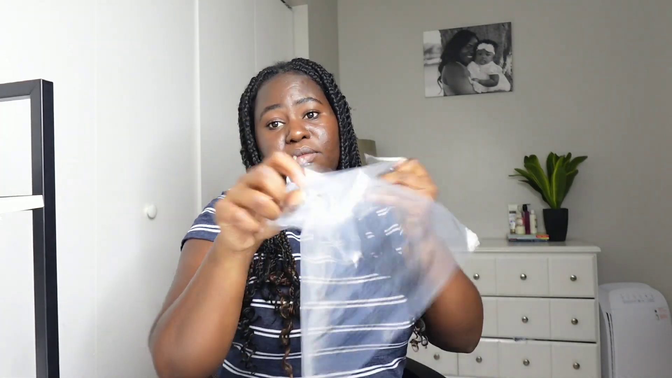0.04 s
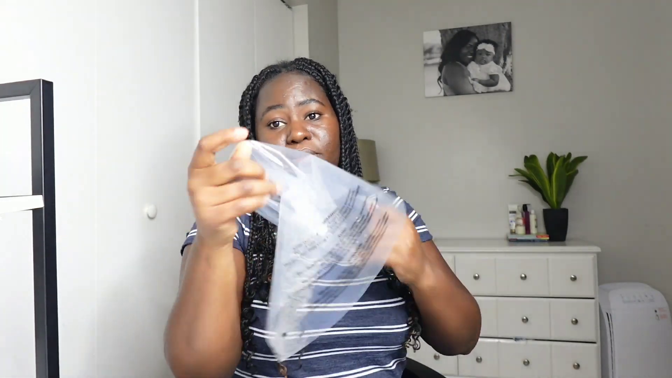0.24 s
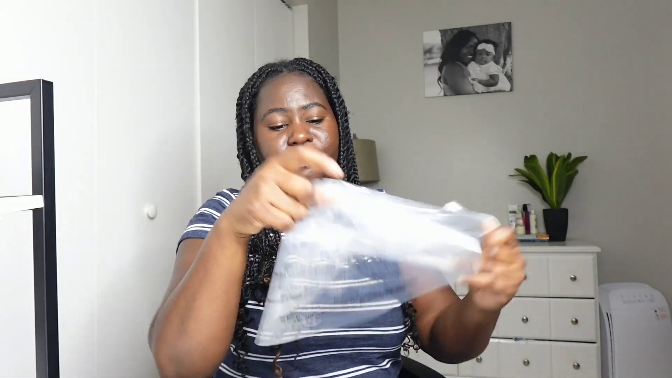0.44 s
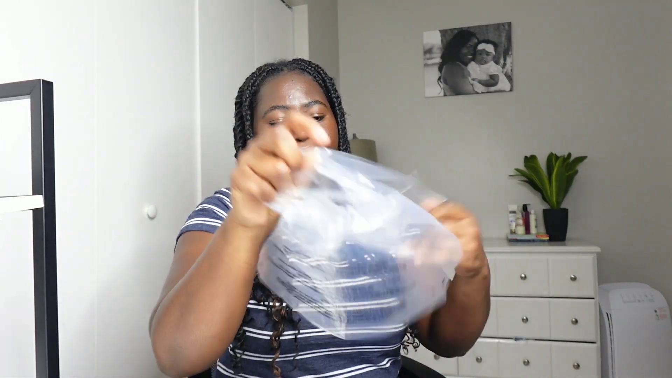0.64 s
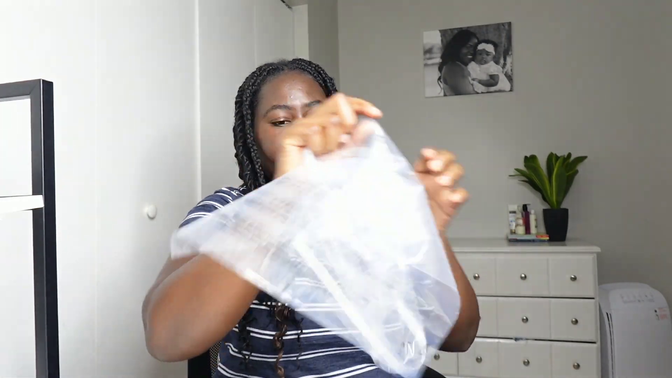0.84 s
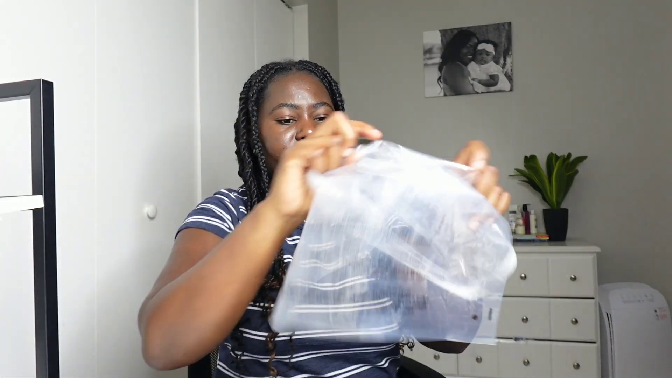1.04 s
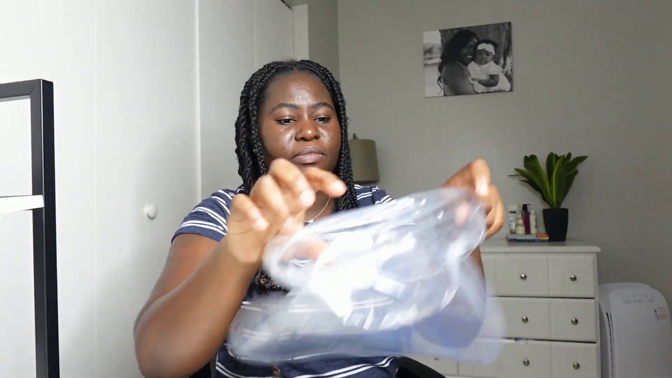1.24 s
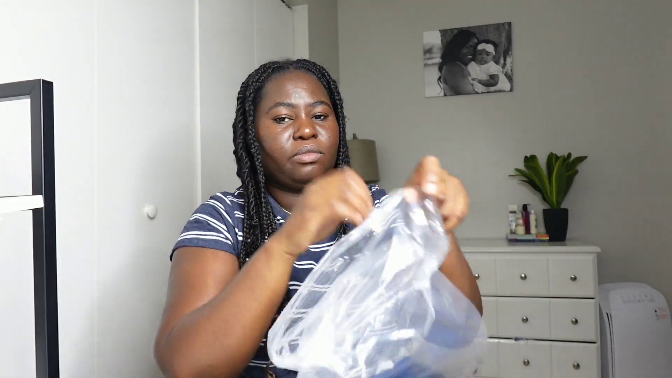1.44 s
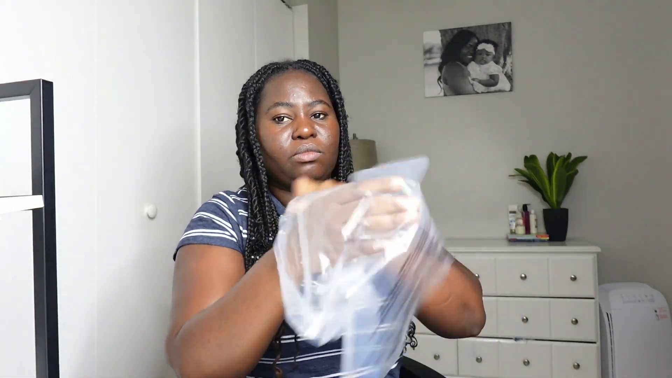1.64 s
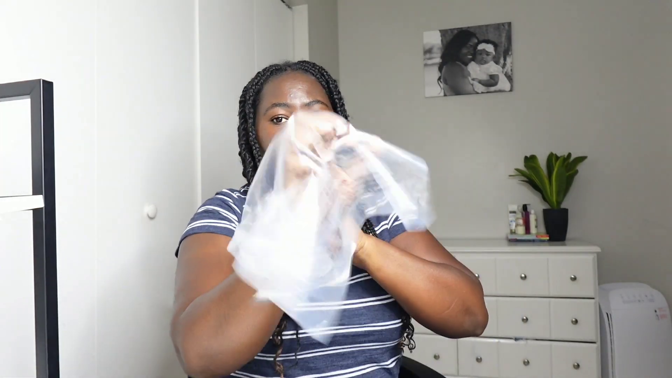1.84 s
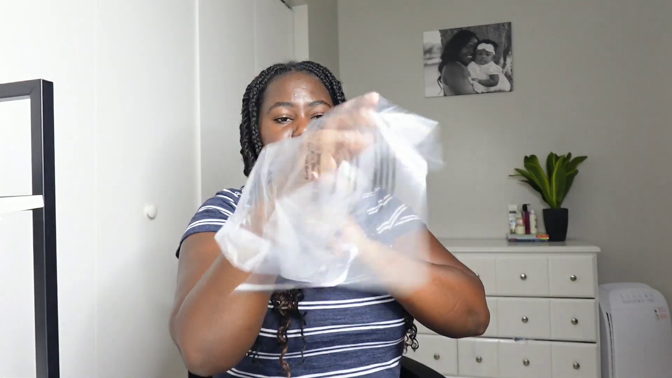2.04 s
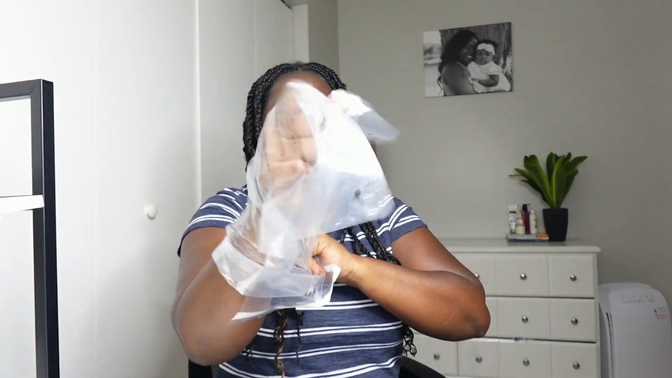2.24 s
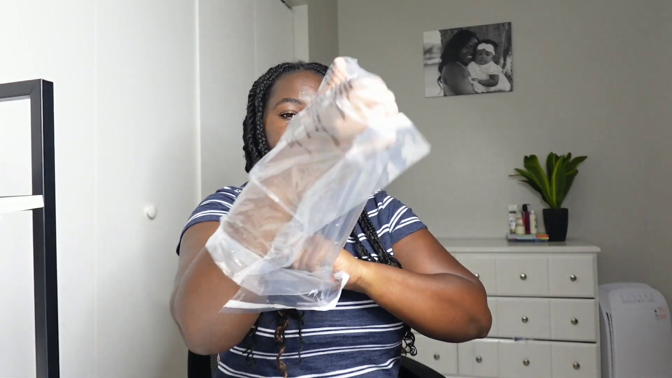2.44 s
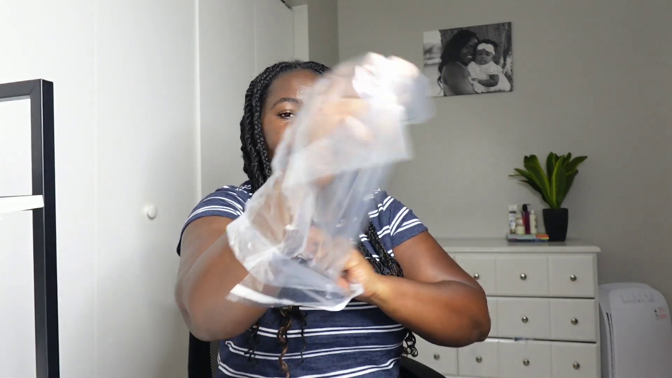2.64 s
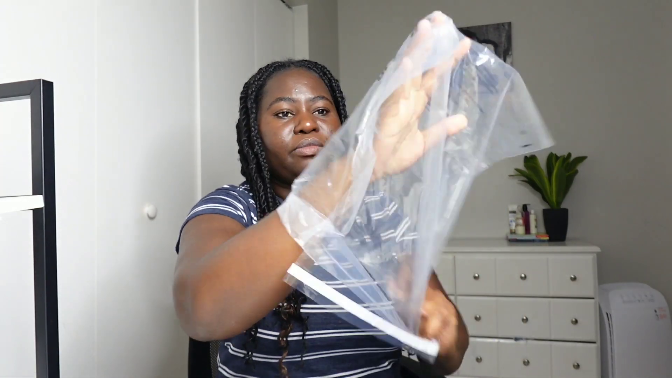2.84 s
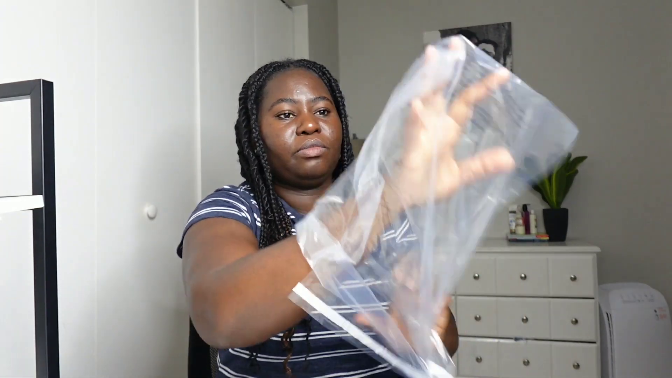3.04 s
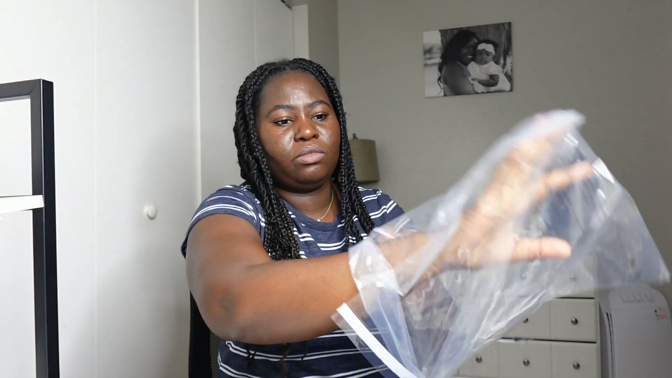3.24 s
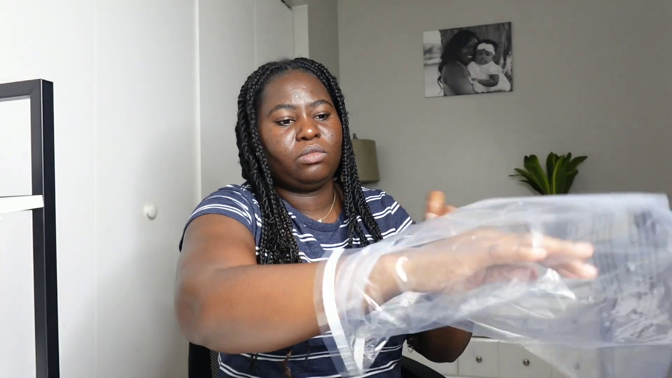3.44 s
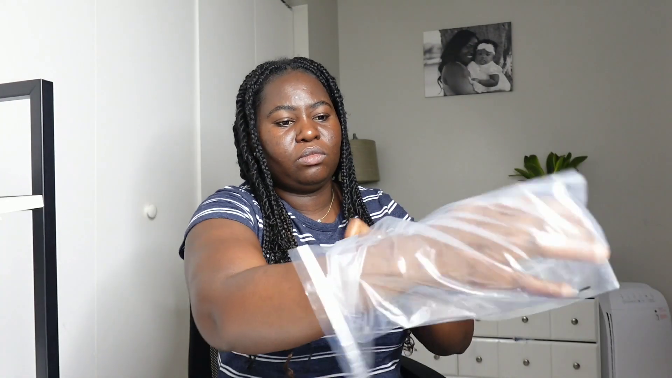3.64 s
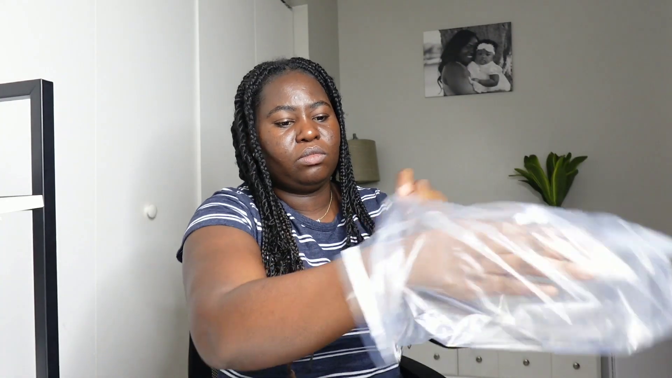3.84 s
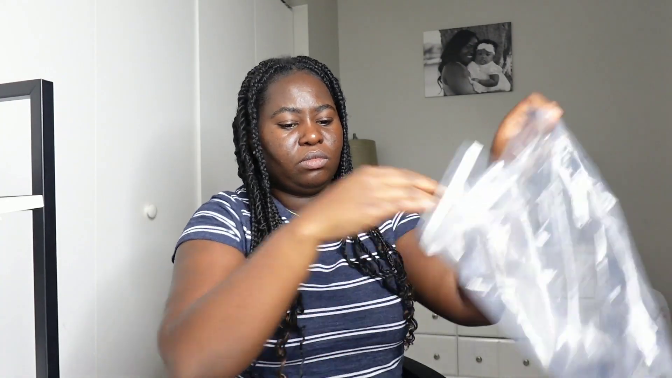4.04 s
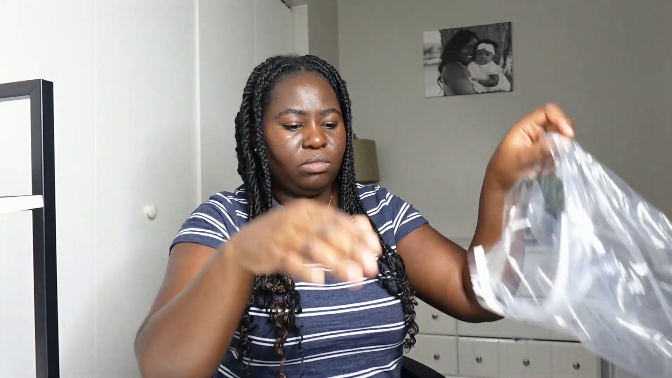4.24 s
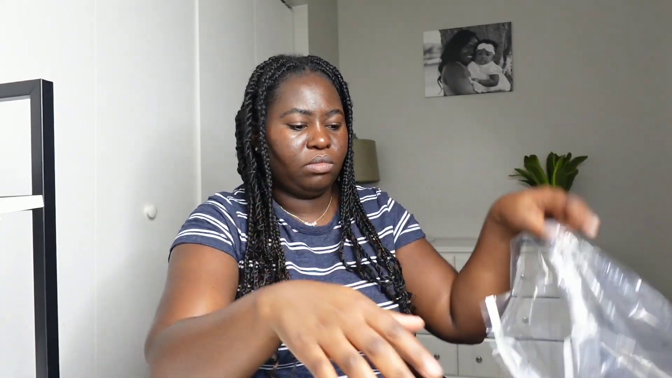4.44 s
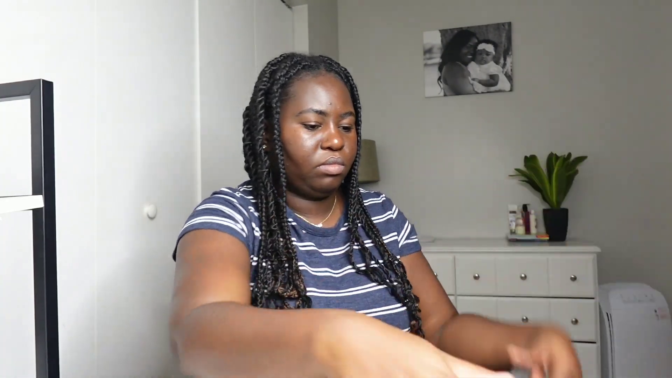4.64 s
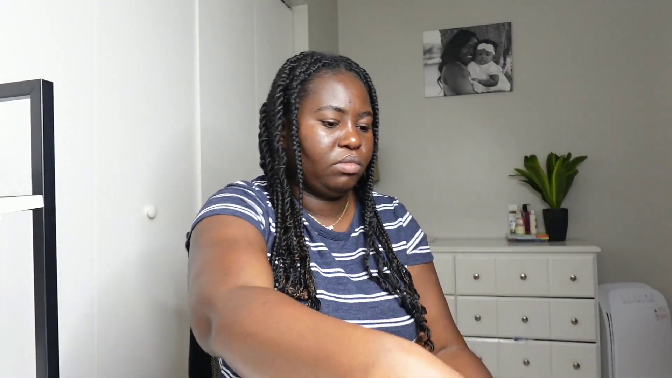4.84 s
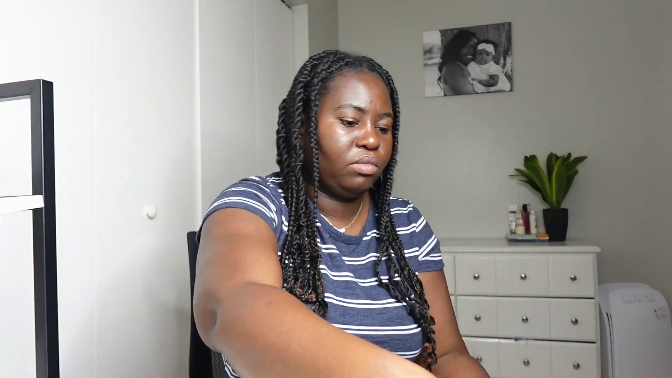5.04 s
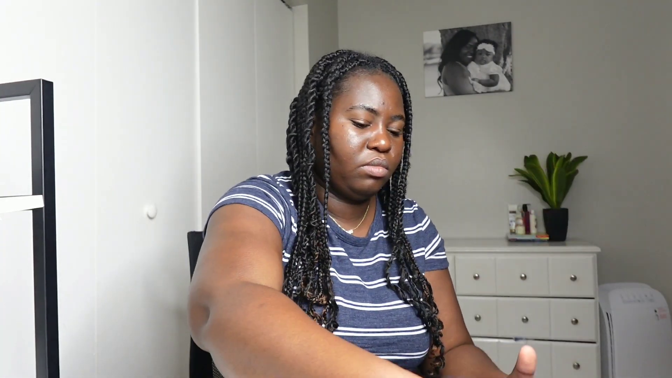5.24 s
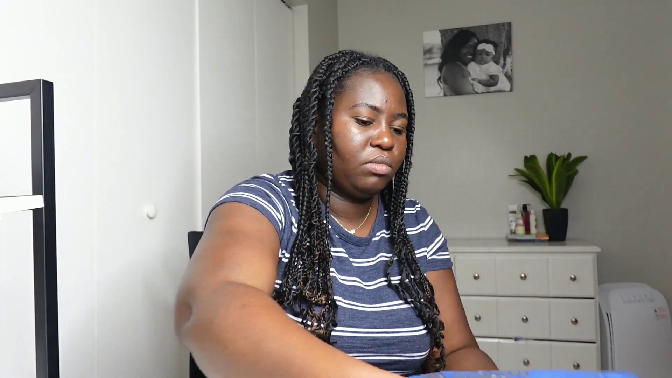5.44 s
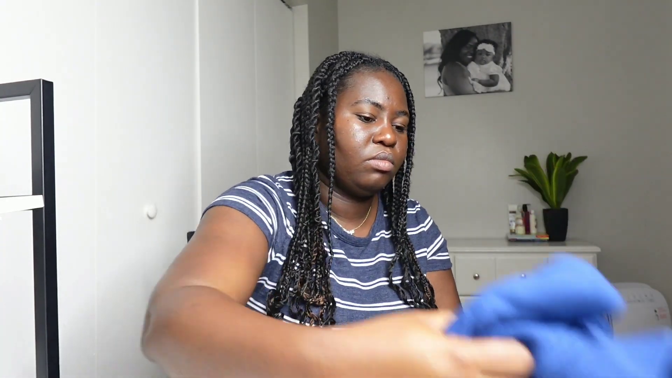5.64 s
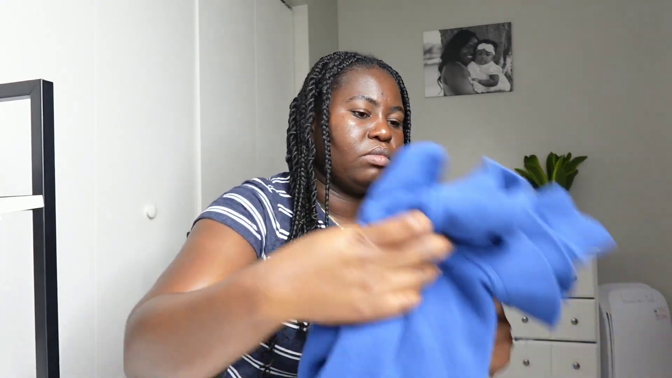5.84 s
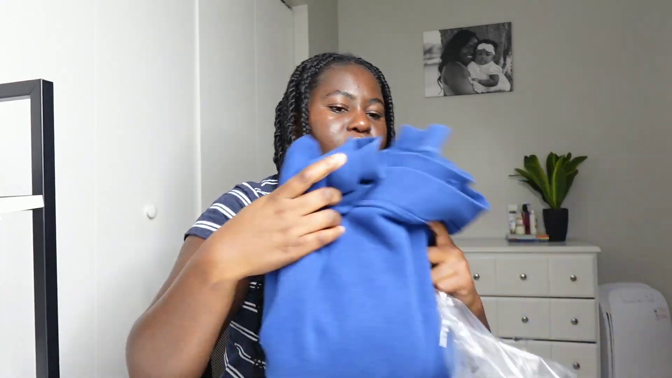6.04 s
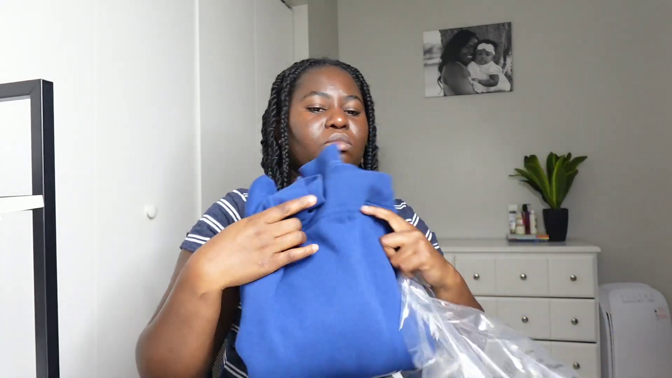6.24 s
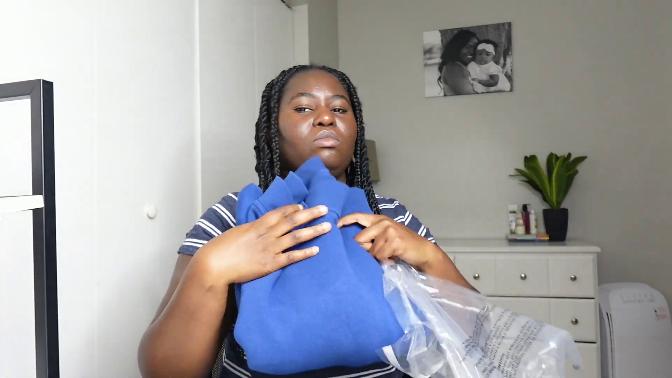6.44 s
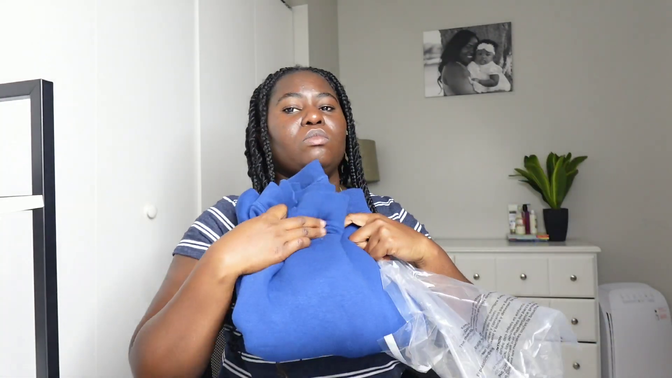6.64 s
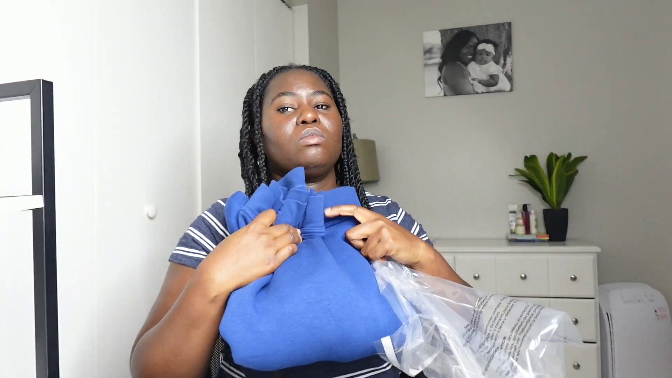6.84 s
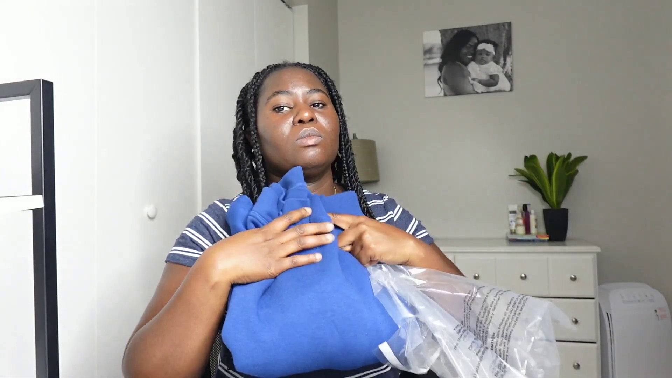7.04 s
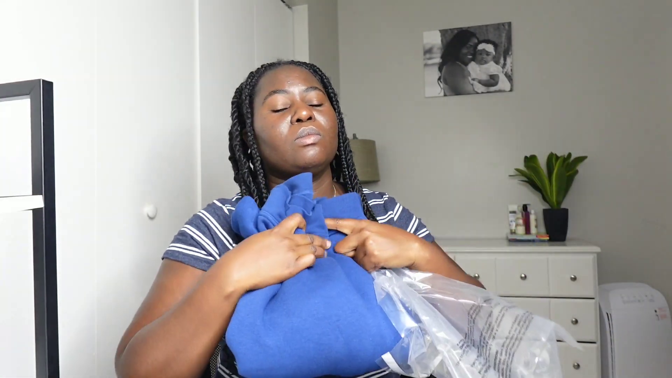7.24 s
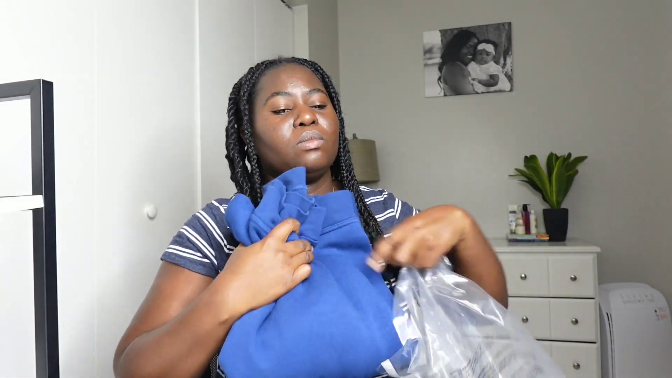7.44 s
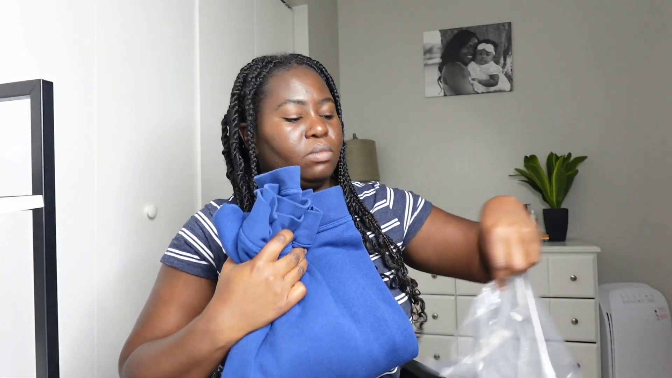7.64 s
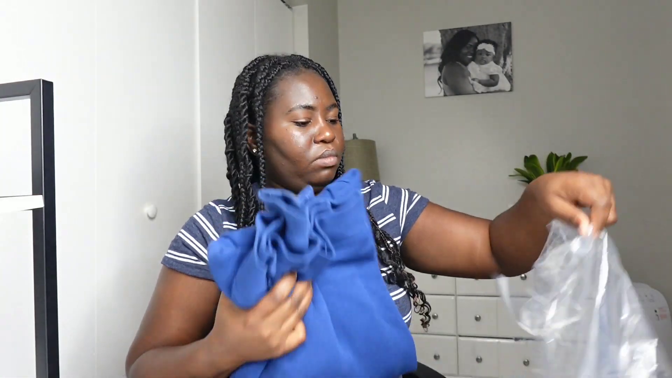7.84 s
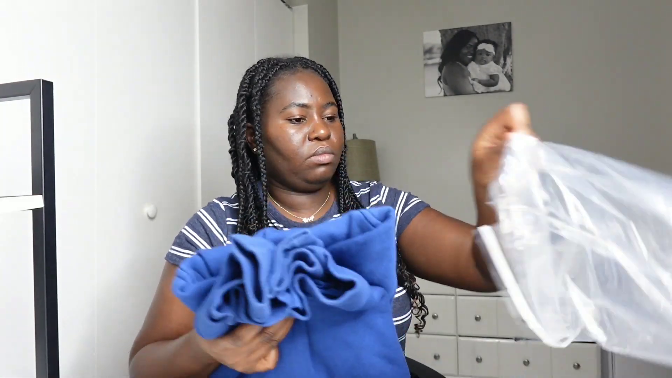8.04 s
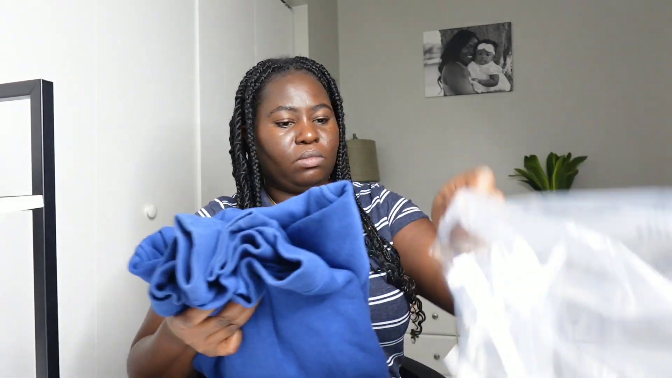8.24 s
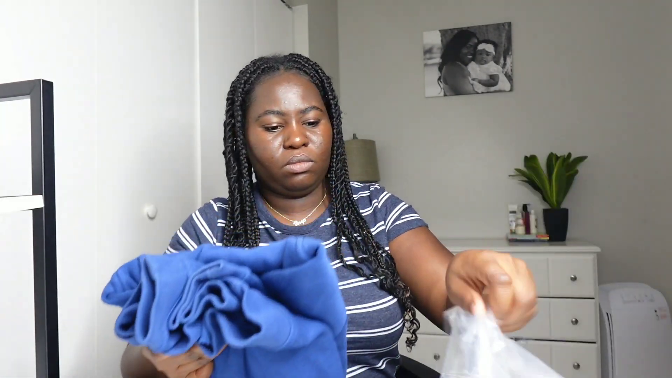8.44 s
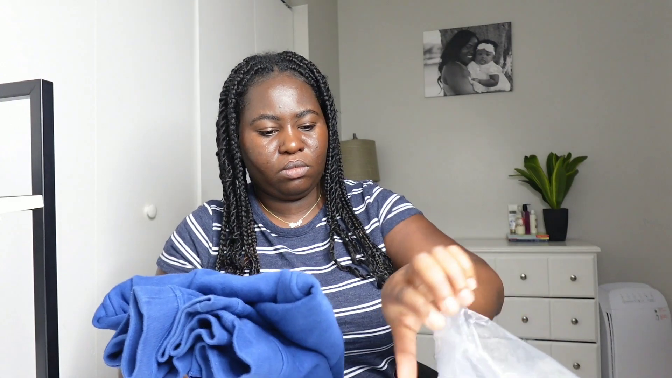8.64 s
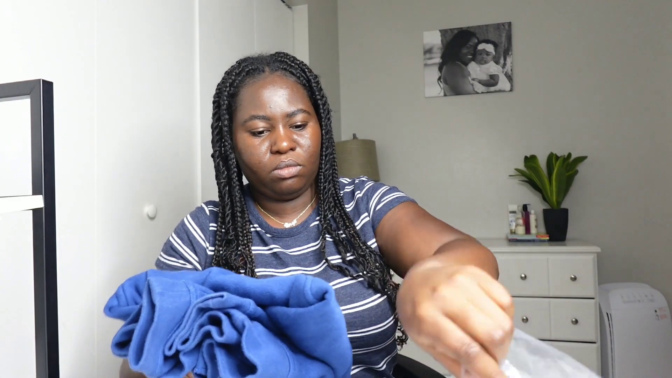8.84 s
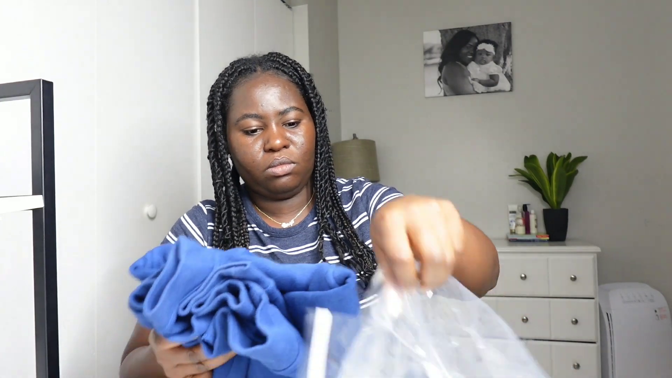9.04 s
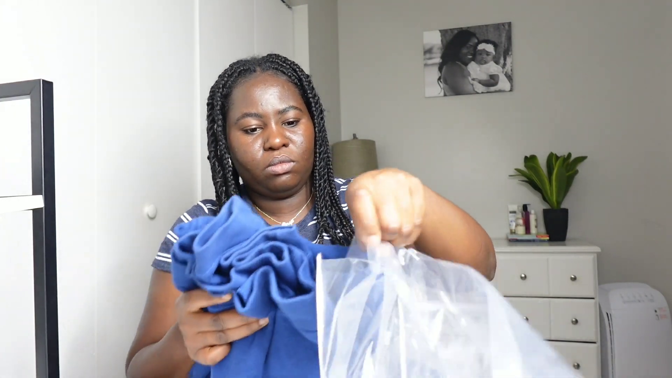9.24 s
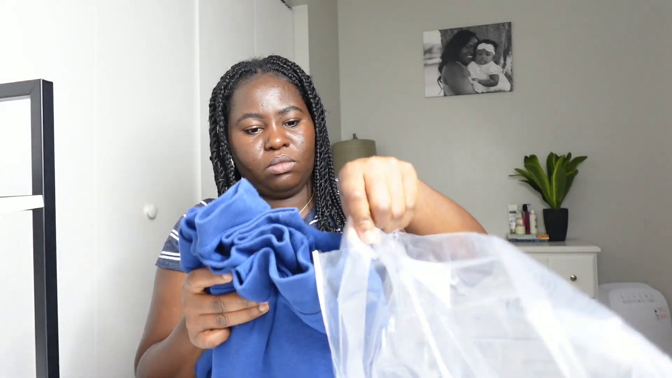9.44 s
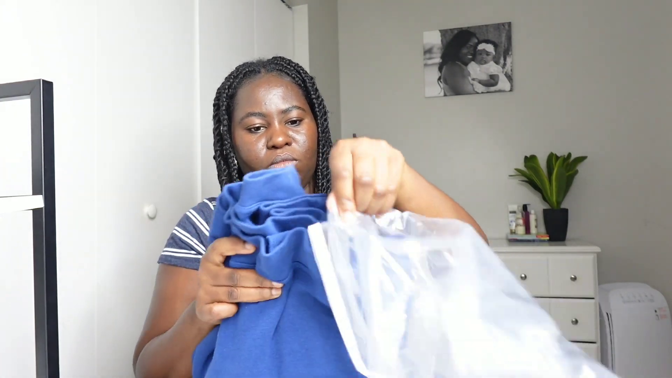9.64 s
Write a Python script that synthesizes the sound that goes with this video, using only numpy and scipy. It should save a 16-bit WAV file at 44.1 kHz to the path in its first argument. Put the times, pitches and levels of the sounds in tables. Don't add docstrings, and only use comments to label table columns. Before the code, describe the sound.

Bright, dense crackling of thin plastic film in a small room drops to soft rubbing and a light knock, then returns in uneven bursts.

```python
import sys
import numpy as np
from scipy import signal
from scipy.fft import rfft, irfft
from scipy.io import wavfile

SR = 44100
rng = np.random.default_rng(int(sys.argv[2]) if len(sys.argv) > 2 else 0)


def materialize(psi):
    bounded = np.clip(np.atleast_2d(psi).T, -1, 1)
    quanta = np.round(bounded * 32767).astype(np.int16)
    wavfile.write(sys.argv[1], SR, quanta)


def invert_db(x):
    u = np.asarray(x, float) / 20
    return 10 ** u


N = 427769


def rms_one(x):
    return x / np.sqrt(np.mean(x ** 2) + 1e-20)


def in_time(rows):
    s, *columns = np.transpose(rows)
    return [np.interp(np.arange(N) / SR, s, column) for column in columns]


def at_hz(points, hz):
    point_hz, value = np.transpose(points)
    return np.interp(np.log(hz), np.log(point_hz), value)


def coloured(x, spectrum, remove=1, size=4096):
    bin_hz = np.arange(1, size // 2 + 2) * SR / size
    wanted = invert_db(at_hz(spectrum, bin_hz)) / remove
    cepstrum = irfft(np.log(wanted))
    cepstrum[1:size // 2] *= 2
    cepstrum[size // 2 + 1:] = 0
    response = irfft(np.exp(rfft(cepstrum)))[:size]
    return signal.oaconvolve(x, response)[:N]


def band(x, low_hz, high_hz):
    return signal.sosfilt(signal.butter(2, [low_hz, high_hz], "band", fs=SR, output="sos"), x)


def split(x, edges_hz):
    lows = []
    for hz in edges_hz:
        order = 4 if hz < 3000 else 1
        lows.append(signal.sosfiltfilt(signal.butter(order, hz, fs=SR, output="sos"), x))
    return [upper - lower for lower, upper in zip([0, *lows], [*lows, x])]


def drift(rate):
    r = np.exp(-80 * np.pi * rate / SR)
    slow = signal.lfilter([1], [1, -2 * r, r * r], rng.standard_normal(N // 40 + 2002))[2000:]
    return np.interp(np.arange(N) / 40, np.arange(len(slow)), rms_one(slow))


def pair(alike, size):
    mid, side = rng.standard_normal((2, size))
    alike = np.clip(alike, 0, 1)
    return np.sqrt(1 + alike) * mid + np.sqrt(1 - alike) * side * [[1], [-1]]


# pitch in Hz, level in dB rms.
MOTOR_HUM = [(58.7, -86), (59.46, -87)]
# pitch in Hz, density in dB per Hz.
HISS_COLOUR = [(30, -23), (70, -4.5), (150, 5), (380, 5), (550, 1.5), (4000, -12), (9000, -20),
               (16000, -20)]
HISS_DB, HISS_ALIKE, HUM_LOUDEST_S = -61.5, 0.36, 7.22


def background():
    t = np.arange(N) / SR - HUM_LOUDEST_S
    hum = sum(np.sqrt(2) * invert_db(db) * np.sin(2 * np.pi * hz * t) for hz, db in MOTOR_HUM)
    hiss = np.array([coloured(side, HISS_COLOUR) for side in pair(HISS_ALIKE, size=N)])
    return invert_db(HISS_DB) * rms_one(hiss) + hum


# hardest grip in seconds, crackle in dB,
# seconds to rise 20 dB, seconds to fall 20 dB (signs ignored), flap of the sheet over crackle in dB.
OPENING = [(0.085, -21, 0.588, 0.42, -14.5), (0.125, -27, -0.15, 0.03, -14.0),
           (0.335, -23.5, 0.15, 0.5, -14), (0.464, -23, 0, 0.1, -21), (0.686, -24.5, 0.5, 0.11, -19.5),
           (0.988, -27.0, -0.01, 0.32, -21), (1.082, -19.0, 0.0742, 0.17, -22),
           (1.143, -20, 0.06, 0.14, -16.0), (1.302, -27.5, 0.19, 0.04, -14.5),
           (1.412, -29.5, 0, 0.6, -14.5), (1.544, -20.5, -0.06, 0.4, -15.0),
           (1.708, -18.5, 0.1, 0.27, -16.5), (1.924, -20, 0.31, 0.07, -18.5), (2.008, -23, 0.06, 0.1, -16),
           (2.03, -18.5, 0.09, 0.18, -15.5), (2.056, -22, 0.17, 0, -17.0), (2.162, -23, 0.12, 0.45, -25.5),
           (2.364, -22.0, 0.54, 0.18, -15.0), (2.571, -19, 0.16, 0.07, -17.5), (2.672, -23, 0, 0.18, -20.5),
           (2.725, -21.5, 0.12, 0.22, -20), (2.9, -23.5, 0.15, 0.07, -22), (3.015, -32, 0.1, 0.24, -14),
           (3.17, -41, 2, 0.08, -21), (3.287, -30, 0.1, 0.42, -30), (3.505, -20, 0.12, 0.2736, -23),
           (3.56, -18.5, 0.19, 0.1762, -14), (3.943, -26, 0.16, 0.03, -25.5),
           (4.026, -28.0, 0.9, 0.1753, -16.5)]
LAYING_ASIDE = [(4.234, -43, 0.003, 0.18, -18.5), (4.433, -37.5, 0.0075, 0.11, -33),
                (4.557, -39, 0.22, 0.13, -21), (4.705, -38, 0.012, 0.4, -23),
                (4.864, -35.5, 0.36, 0.14, -14), (5.016, -38.5, 0.019, 0.27, -12),
                (5.203, -44, 0.14, 0.35, -11), (5.275, -46, 0.18, 0.045, -20),
                (5.416, -50, 0.247, 0.46, -9.5), (5.632, -54, 0.012, 0.46, -5),
                (5.778, -44.5, 0.005, 0.24, -5), (5.874, -37, 0.19, 0.13, -12.5),
                (6.022, -39.5, 0.003, 0.23, -12.5), (6.246, -41.0, 0.003, 0.37, -16),
                (6.532, -51.5, 0.14, 0.19, -12), (6.952, -51.5, 0.22, 0.41, -12),
                (7.083, -61, 0.012, 0.17, -6), (7.282, -55, 0.012, 0.082, -16)]
TAKING_UP = [(7.331, -52.5, 0.003, 0.55, -16), (7.44, -50, 0.046, 0.083, -11),
             (7.541, -28.5, 0.0033, 0.092, -19), (7.596, -34.5, 0.26, 0.72, -19.5),
             (7.667, -34, 0.04, 0.093, -29), (7.768, -37.5, 0.18, 0.063, -28),
             (7.939, -29.5, 0.071, 0.074, -12.5), (8.249, -38.5, 0.39, 0.29, -23),
             (8.421, -25, 0.005, 0.15, -17.5), (8.582, -42, 0.17, 0.08, -11.5),
             (8.823, -34.5, 0.0071, 0.19, -18), (8.853, -40, 0.051, 0.95, -10.5),
             (8.864, -29.5, 0.047, 0.2, -34), (9.013, -32.5, 0.027, 0.075, -14.0),
             (9.116, -34, 0.05, 0.37, -14.5), (9.268, -40, 0.071, 0.084, -22),
             (9.457, -31, 0.16, 0.054, -18.5), (9.69, -28.5, 0.24, 0.04, -19)]
SWARM_DB, SWARM_FALL_S, SWARM_FLAP_DB = -26, 0.06, -22


def handling():
    t = np.arange(0, N, 32) / SR
    crackle_power, flap_power = 1e-12, 1e-12
    swarms = [(s, db + SWARM_DB, 0, SWARM_FALL_S, SWARM_FLAP_DB) for s, db, hz, decay_ms in large_creases()]
    for s, db, rise_s, fall_s, flap_db in [*OPENING, *LAYING_ASIDE, *TAKING_UP, *swarms]:
        before = (s - t) / max(abs(rise_s), .002)
        after = (t - s) / max(abs(fall_s), .01)
        power = invert_db(2 * db - 40 * np.where(t < s, before, after))
        crackle_power = crackle_power + power
        flap_power = flap_power + power * invert_db(2 * flap_db)
    return [np.interp(np.arange(N) / SR, t, 10 * np.log10(p)) for p in (crackle_power, flap_power)]


def buckle(noise, hz, width_hz, rise_s, decay_s, ring_share):
    t = np.arange(1, len(noise) + 1) / SR
    rise = np.minimum(t / max(rise_s, 1e-5), 1) ** 2
    fall = np.exp(-np.maximum(t - rise_s, 0) / max(decay_s, 5e-5))
    tick = noise * rise * fall
    r = np.exp(-np.pi * width_hz / SR)
    rung = signal.lfilter([1, 0, -1], [1, -2 * r * np.cos(2 * np.pi * hz / SR), r * r], tick)
    both = ring_share * rms_one(rung) + rms_one(tick)
    return both / np.abs(both).max()


def needles(crackle_db, top_db, dense_db):
    mean_per_s = 20 * invert_db(4.0 * drift(12) - 1.5 * dense_db + .4 * (crackle_db + 30))
    born = rng.random(N) < mean_per_s / SR
    sizes = invert_db(19 + 4.8 * rng.standard_normal(N)) * rng.choice([-1, 1], N)
    return band(born * sizes * invert_db(crackle_db + 0.24 * top_db), 5000, 17000)


# pitch in Hz, density in dB per Hz.
FILM_COLOUR = [(35, -33), (60, -27), (110, -8.5), (260, -0.5), (400, 1), (490, -4), (620, -2.5), (1000, 2),
               (2000, 2.5), (4000, 3.5), (8000, 0), (12000, -2.5), (16000, -6)]
# time in seconds, extra density in dB, size spread in dB.
GRAIN = [(0, 2.5, 2), (4.2, 2.5, 2.5), (4.45, 15, 2.5), (5.95, 15, 0), (6.05, 11, -2.5), (7.3, 11.5, -0.5),
         (7.6, 6, 1), (9.7, 5, 2)]


def crackle(crackle_db, top_db, flap_db, middle_db, count=20):
    dense_db, spread_db = in_time(GRAIN)
    mean_per_s = 2200 * invert_db(.4 * (crackle_db + 30.0) + dense_db)
    clumps = invert_db(1.2 * drift(30) + 1.6 * drift(160))
    born = rng.random(N) < mean_per_s * clumps / SR
    sizes = invert_db(spread_db * (np.minimum(rng.exponential(1, N), 4.5) - 1.17)) * rng.choice([-1, 1], N)

    patch = rng.integers(0, count, N)
    noise = rng.standard_normal((count, 256))
    patch_hz = np.geomspace(1800, 13000, count)
    shapes = [rms_one(buckle(n, hz, 0.3 * hz, .0001, 0.0004, 0.9)) for n, hz in zip(noise, patch_hz)]
    ticks = sum(signal.oaconvolve(sizes * born * (patch == k), shape)[:N] for k, shape in enumerate(shapes))
    own_colour = np.sqrt(np.mean(np.abs(rfft(shapes, 4096)) ** 2, axis=0))
    sheet = coloured(ticks / np.sqrt(mean_per_s), FILM_COLOUR, remove=own_colour)
    low, middle, main, top = map(rms_one, split(sheet, [600, 2000, 9000]))

    air = coloured(rng.standard_normal(N), FILM_COLOUR) * invert_db(3.5 * drift(9))
    flap = rms_one(rms_one(split(air, [600])[0]) + 0.82 * low)
    body = invert_db(flap_db) * (flap + invert_db(middle_db) * middle)
    bright = invert_db(crackle_db - 2.0) * (main + invert_db(top_db + 0.5) * top)
    return bright + body + needles(crackle_db, top_db, dense_db)


SHAKING_ENDS_S = 4.1
CREASE_OVER_DB, CREASE_SPREAD_DB = 11.5, 2


def lesser_creases(crackle_db, count=45):
    when, size, pitch = rng.random((count, 3)).T
    s = when * SHAKING_ENDS_S
    around_db = (crackle_db - 0.45 * in_time(GRAIN)[0])[(s * SR).astype(int)]
    db = around_db + CREASE_OVER_DB - CREASE_SPREAD_DB * np.log(size + 0.044)
    return list(zip(s, db, 2300 * 4.0 ** pitch, 1 - pitch / 2))


# sharpest tick in seconds, strength in dB, ring in Hz, decay
# in ms.
SNAPS = [(0.0276, -0.5, 3790, 0.93), (0.1252, -5.5, 3880, 1.1), (0.2385, -8, 6290, 0.45),
         (0.3055, -7.0, 8440, 0.35), (0.4572, -8, 7110, 0.8), (0.5481, -11, 7540, 0.85),
         (0.5704, -7.0, 11710, 0.59), (0.5809, -9, 3230, 0.82), (0.5997, -4, 12880, 0.61),
         (0.6732, -6, 10590, 0.67), (0.7374, -11.5, 3270, 0.78), (0.7735, -9.5, 3190, 1.53),
         (0.8334, -19, 9260, 0.49), (0.8517, -19.0, 3920, 0.8), (0.8717, -21.5, 5040, 0.7),
         (0.896, -22.0, 4780, 0.93), (0.9194, -25.5, 7920, 1.17), (1.1339, -2.0, 4570, 0.66),
         (1.2322, -8.5, 10420, 0.85), (1.2975, -7.5, 3140, 0.63), (1.3081, -14, 9130, 0.7),
         (1.3412, -16, 7540, 0.8), (1.3837, -12.5, 8910, 1.5), (1.4116, -10, 9990, 0.96),
         (1.4247, -11, 10080, 1.59), (1.4458, -8, 4180, 1.2), (1.4705, -11, 3880, 1.34),
         (1.4975, -15, 3880, 1.6), (1.5055, -15, 8830, 1.6), (1.5425, -13, 4820, 1.59),
         (1.5833, -0.5, 7240, 1.45), (1.6395, -5, 8740, 0.45), (1.8113, -3.5, 4740, 0.68),
         (1.8741, -2, 3450, 1.39),
         (2.007, -4.5, 9040, 1.11), (2.131, -7.5, 5340, 1.42), (2.1646, -7, 1940, 0.49),
                  (2.1982, -3.5, 11840, 1.08), (2.3322, -2, 10470, 0.67), (2.4142, -4, 6930, 1.2),
                  (2.4811, -5, 7490, 0.78), (2.653, -10.5, 2840, 1), (2.6876, -4, 8830, 0.54),
                  (2.8078, -1, 11930, 0.76), (2.909, -6.5, 7490, 0.55), (2.9783, -8, 5210, 0.82),
                  (3, -10, 3700, 1.1), (3.0059, -11.5, 6590, 1.5), (3.027, -10.5, 5210, 1.23),
                  (3.0986, -18, 5340, 1.6), (3.102, -13, 7400, 1), (3.133, -18.5, 7360, 0.94),
                  (3.1584, -19, 4090, 1.6), (3.1661, -24, 3660, 1.16), (3.188, -17, 3880, 1.2),
                  (3.233, -20.5, 3750, 1.41), (3.2436, -14, 3400, 0.46), (3.419, -10, 4650, 1.3),
                  (3.4261, -10.0, 12530, 0.62), (3.4556, -6.5, 4740, 1.09), (3.473, -2, 6680, 0.69),
                  (3.6868, -12, 6160, 0.71), (3.7025, -13, 3620, 1.2), (3.7219, -7.5, 6680, 1.1),
                  (3.8635, -10, 4970, 1.6), (3.8933, -8, 4480, 1.7), (4.0251, -11.5, 4010, 1.21),
                  (4.0424, -12.0, 3620, 1.07),
         (4.1725, -26.5, 2890, 1.6), (4.219, -29.5, 2540, 1.6), (4.227, -29.5, 2070, 0.89),
               (4.2342, -14, 4200, 0.75), (4.2397, -25.5, 4780, 0.82), (4.2528, -23, 3100, 0.76),
               (4.4113, -29, 3920, 1.6), (4.4355, -22.5, 3490, 1.08), (4.4531, -22.0, 8700, 1.4),
               (4.4703, -23.5, 4610, 1.25), (4.5184, -24.0, 4050, 1.4), (4.6091, -23.5, 8660, 1.5),
               (4.7037, -20, 9650, 1.1), (5.015, -23, 4570, 1.12), (5.0942, -23.5, 3920, 1),
               (5.1933, -24.5, 5990, 1.21), (5.2046, -25, 5680, 0.73), (5.6408, -33.5, 5120, 1.35),
               (5.6774, -27, 4390, 0.91), (5.8203, -21.0, 5560, 1.6), (5.8501, -17.5, 9730, 1.5),
               (5.979, -34, 4950, 1.25), (6.0219, -12, 6460, 0.69), (6.0289, -20.0, 5990, 0.91),
               (6.1347, -24.0, 2890, 1.3), (6.2036, -37.5, 3360, 1.38), (6.2232, -34, 3570, 1.54),
               (6.2449, -25, 4480, 1.3), (6.2596, -23, 6760, 1.6), (6.2673, -20, 4780, 1.6),
               (6.2807, -13.5, 5250, 0.69), (6.3337, -26, 5040, 1.6), (6.388, -31.0, 3880, 1.6),
               (6.4362, -37, 4910, 1.37), (6.453, -32, 2970, 1.07), (6.4966, -30, 5080, 1.08),
               (6.5048, -33, 2070, 1.47), (6.531, -34.0, 2070, 1.6), (6.6272, -39, 2500, 1.14),
               (6.883, -33.0, 2840, 1.8), (6.9326, -31.0, 5300, 1.04), (6.95, -29.5, 6290, 1.4),
               (7.0832, -35, 3060, 1.44), (7.0941, -32.5, 4740, 1.05), (7.1943, -37.5, 3450, 1.45),
               (7.2822, -29, 2890, 1.5), (7.3307, -20, 8910, 1.38), (7.3659, -28.0, 5080, 1.01),
               (7.3806, -33, 3270, 0.78), (7.3909, -30.5, 2450, 1.07),
         (7.4029, -31.0, 4090, 1.21), (7.4195, -28, 2890, 1.02), (7.4247, -22.0, 6980, 1.34),
                 (7.4497, -17.5, 12620, 1.0), (7.4919, -18, 4650, 1.7), (7.5206, -15, 4780, 1.42),
                 (7.5411, -3, 7450, 0.92), (7.5524, -10, 6330, 1.1), (7.5688, -7.0, 3700, 1),
                 (7.5926, -13, 10030, 0.44), (7.6782, -15, 6980, 1.17), (7.7392, -17.5, 2760, 1.15),
                 (7.7495, -9, 5510, 1.2), (7.8536, -18, 3570, 1.5), (7.8933, -20, 4050, 1.36),
                 (7.9006, -13.5, 4650, 1.35), (7.9346, -14.5, 3360, 0.67), (7.998, -16, 5170, 1.54),
                 (8.0495, -20.5, 2890, 1.21), (8.0919, -16.5, 2500, 0.95), (8.145, -23, 6630, 0.8),
                 (8.165, -13, 3140, 1.51), (8.197, -19, 5430, 1.6), (8.2184, -16.5, 3570, 1.6),
                 (8.2397, -7.5, 7060, 1.6), (8.2944, -20.5, 6850, 0.89), (8.3178, -18, 2630, 1.4),
                 (8.3686, -26, 4690, 1.6), (8.4195, -17, 3700, 0.77), (8.448, -9, 4950, 0.98),
                 (8.4588, -8, 5170, 1.4), (8.4873, -8.0, 3880, 1.6), (8.5059, -12, 11500, 0.72),
                 (8.5756, -24, 4480, 1.46), (8.6274, -33, 4570, 1.6),
         (8.7798, -40.5, 4010, 1.6), (8.8647, -7.5, 11630, 0.83), (8.8703, -11, 4740, 1.06),
                   (8.8893, -11, 6370, 0.78), (8.9587, -20, 8100, 0.5), (8.969, -11.5, 5040, 1.6),
                   (9.0726, -20, 6500, 1.6), (9.117, -13.0, 11150, 1.6), (9.1348, -12, 6590, 1.6),
                   (9.17, -11, 10420, 0.7), (9.2025, -6.5, 12700, 0.74), (9.24, -18.0, 3320, 1.3),
                   (9.257, -15, 3620, 0.86), (9.2678, -19, 4950, 0.69), (9.3461, -18, 6630, 1.1),
                   (9.3558, -13, 6070, 0.94), (9.3827, -9.5, 5250, 1.55), (9.4118, -16.5, 5680, 0.91),
                   (9.4282, -17.5, 7020, 0.79), (9.4374, -17.5, 5380, 1), (9.4596, -13.0, 3140, 1.4),
                   (9.5037, -15.5, 6590, 1.6), (9.5657, -20, 6760, 0.45), (9.5827, -12.5, 4440, 1.7),
                   (9.5885, -18, 3450, 0.52), (9.6126, -16.5, 4520, 1.09), (9.642, -15.0, 5040, 1.14),
                   (9.6526, -17.5, 7320, 0.67), (9.6696, -16, 2710, 0.58), (9.6831, -11, 11150, 1.14)]


def large_creases():
    return SNAPS


CREASE_LEAD_S, CREASE_RING, CREASE_DB = .0004, .8, -18.8
CREASE_TOP_HZ, CREASE_DULLING = 15000, .4


def snaps(crackle_db):
    size = 441
    out = np.zeros(N + size)
    creases = [*large_creases(), *lesser_creases(crackle_db)]
    noise, spread = rng.standard_normal((len(creases), size)), rng.random(len(creases))
    thin = signal.butter(2, 1700, "high", fs=SR, output="sos")
    for (s, db, hz, decay_ms), n, u in zip(creases, noise, spread):
        rise_s = (.2 + .4 * u) * decay_ms / 1000
        shape = buckle(n, hz, 500 + .12 * hz, rise_s, decay_ms / 1500, CREASE_RING)
        spike = np.clip(hz / 5000, .8, 1.5) / max(decay_ms, .5)
        shape[round(rise_s * SR):][:2] += np.array([1, -1]) * spike
        top_hz = max(CREASE_TOP_HZ * invert_db(CREASE_DULLING * (db + 20)), 1.5 * hz)
        dull = np.exp(-2 * np.pi * top_hz / SR)
        shape = signal.lfilter([1], [1, -2 * dull, dull ** 2], shape)
        shape = signal.sosfilt(thin, shape)
        start = max(round((s + CREASE_LEAD_S - rise_s) * SR), 0)
        out[start:][:size] += invert_db(db + CREASE_DB) * rms_one(shape)
    return out[:N]


# time in seconds, gain in dB.
POUCH_GAIN = [(0, -1), (.3, 0.5), (1.5, 0), (1.95, 2.5), (2.05, 4.5), (2.35, 2), (2.5, -0.5), (2.72, 4),
              (2.9, 1.5), (3.1, 4), (3.4, 0.7), (4.9, 2), (5.1, 0), (5.45, -4), (5.75, -3), (6.0, 2.5),
              (7.5, -2), (7.95, 4), (8.3, 3.5), (8.9, 0.5), (9.01, 6.5), (9.1, 1.5), (9.7, 3.5)]


def pouch(bag):
    return (invert_db(in_time(POUCH_GAIN)[0]) - 1) * band(bag, 1400, 2030)


# start in seconds, peak in dB, pitch in Hz, swell in seconds.
BUMPS = [(0.076, -26, 270, 0.0053), (0.584, -31.5, 260, 0.0054), (1.088, -28, 373, 0.0054),
         (1.56, -29, 320, 0.0054), (1.689, -19, 258, 0.0094), (3.578, -23, 315, 0.0056),
         (4.75, -40, 344, .006), (4.987, -33.5, 250, .006), (5.014, -37, 240, .004),
         (5.175, -38.5, 280, 0.019), (6.846, -48, 148, .008), (7.927, -33, 287, 0.0054),
         (8.857, -48, 304, 0.0046)]


def bumps():
    size = 8192
    out, t = np.zeros(N + size), np.arange(size) / SR
    for s, db, hz, swell_s in BUMPS:
        swell = t / swell_s * np.exp(1 - t / swell_s)
        out[round(s * SR):][:size] += invert_db(db - 6.0) * swell * np.sin(2 * np.pi * hz * t)
    return out[:N]


# start in seconds, level in dB, top edge of the contact in Hz.
KNOCKS = [
    (4.987, -40, 2000),
    (5.0142, -38, 6000),
    (5.021, -37, 6000),
    (5.0259, -39, 6000),
    (5.032, -42, 6000),
    (5.046, -43, 6000),
]
# pitch in Hz, level in dB, seconds to fall 60 dB.
DESK_MODES = [(700, -3, 0.012), (1150, 3.5, 0.016), (1820, 5, 0.018), (2340, 1.5, 0.054), (2800, 0, .02),
              (3290, 0, 0.054), (4650, -1.5, .012)]


def knocks():
    size = 8192
    t, out = np.arange(size) / SR, np.zeros(N + size)
    for s, db, top_hz in KNOCKS:
        for hz, level_db, t60 in DESK_MODES:
            softness_db = 20 * np.log10(1 + (hz / top_hz) ** 2)
            struck_db = db + level_db - softness_db + 2 * rng.standard_normal()
            ring_db = struck_db - 60 * t / np.clip(t60, .008, .12)
            out[round(s * SR):][:size] += invert_db(ring_db) * np.sin(2 * np.pi * hz * t)
    return out[:N]


# pitch in Hz, seconds to fall 60 dB.
ROOM_T60 = [(200, 0.3), (1000, 0.13), (4000, 0.25), (14000, 0.31)]
# pitch in Hz, likeness of left and right (1 = same).
ROOM_ALIKE = [(100, 1), (1000, 0.2), (5000, 0.13), (14000, 0.3)]
ROOM_DB = -7


def echoes(size=11000):
    t, out = np.arange(size) / SR, 0
    edges = 45 * 2.0 ** np.arange(9)
    for low, high in zip(edges, [*edges[1:], 20000]):
        hz = np.sqrt(low * high)
        noise = band(pair(at_hz(ROOM_ALIKE, hz), size=size), low, high)
        out = out + noise * invert_db(-60 * t / at_hz(ROOM_T60, hz))
    out = out * np.clip((t - .0015) / 0.00052, 0, 1)
    return out / np.sqrt(np.sum(out ** 2) / 2)


def bedroom(x, count=6):
    share = np.array([invert_db(8.0 * drift(14.0)) for place in range(count)])
    share = share / np.sqrt(np.sum(share ** 2, axis=0))
    return sum(signal.oaconvolve((x * s)[None], echoes(), axes=1)[:, :N] for s in share)


# time in seconds, top edge over crackle in dB.
FACING = [(0, -3), (.25, -0.5), (.6, -3), (.9, -5.5), (1.35, -1.5), (1.7, -7.5), (2.4, -1), (2.6, -2.5),
          (3.2, -8), (3.7, -6), (4.1, -10), (4.8, -8.5), (5.7, -1), (6.5, -20), (7.5, -2.5), (8.05, -8.5),
          (8.4, -19), (9.25, -5), (9.7, -6)]
# time in seconds, left over right in dB.
LEAN = [(0.0, 0.5), (1.0, -0.5), (2.29, 0.0), (4.35, -1.5), (4.75, 0.5), (8.35, -1.5), (9.7, -0.5)]
TOP_PER_DB, TOP_FLICKER_DB = 0.1247, 2
MIDDLE_CRACKLE_SHARE, MIDDLE_DB = 0.62, -3.5
CLOTH_HOLLOW = 0.31


def scene():
    crackle_db, flap_db = handling()
    top_db = in_time(FACING)[0] + TOP_PER_DB * (crackle_db + 31.5) + TOP_FLICKER_DB * drift(9.5)
    middle_db = MIDDLE_DB + MIDDLE_CRACKLE_SHARE * (crackle_db - flap_db)
    middle_db = middle_db - CLOTH_HOLLOW * in_time(GRAIN)[0]
    film = crackle(crackle_db, top_db, flap_db, middle_db) + snaps(crackle_db)
    bag = film + pouch(film) + bumps() + knocks()
    lean_db, = in_time(LEAN)
    sides = invert_db(lean_db / 2 * [[1], [-1]])
    return (bag + invert_db(ROOM_DB) * bedroom(bag)) * sides + background()


def band_limit(x):
    return signal.sosfilt(signal.butter(12, 17060, fs=SR, output="sos"), x)


def record(dry):
    rounded = 1.3 * np.tanh(dry / 1.3)
    cut = signal.sosfilt(signal.ellip(12, .3, 60, 15820, fs=SR, output="sos"), rounded)
    cut = signal.sosfilt(signal.butter(3, 46, "high", fs=SR, output="sos"), cut)
    return band_limit(cut)


dry = scene()
out = record(dry)
materialize(out)
```